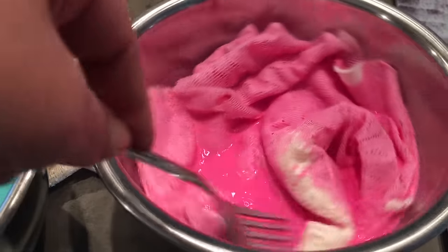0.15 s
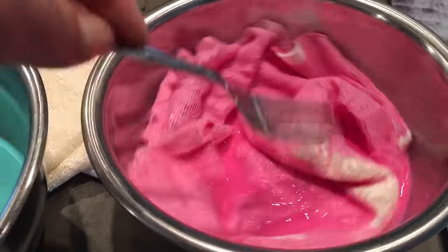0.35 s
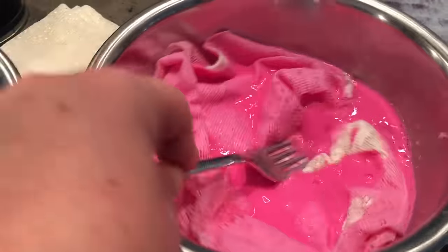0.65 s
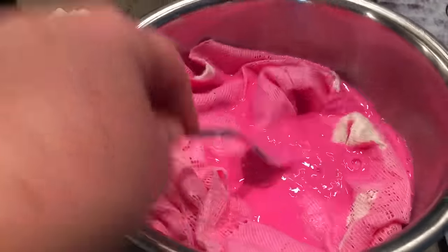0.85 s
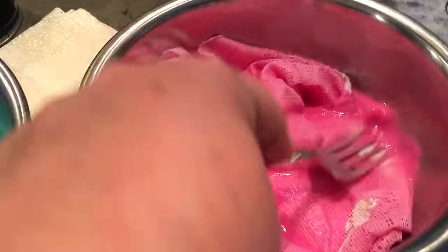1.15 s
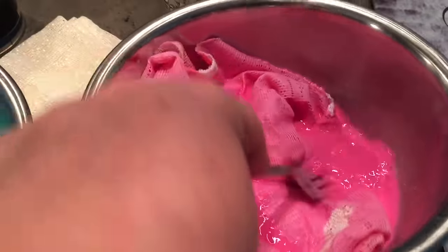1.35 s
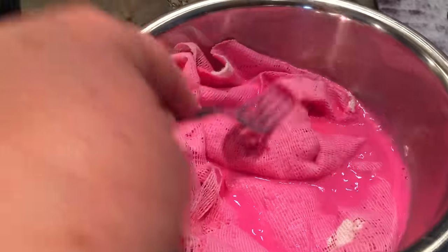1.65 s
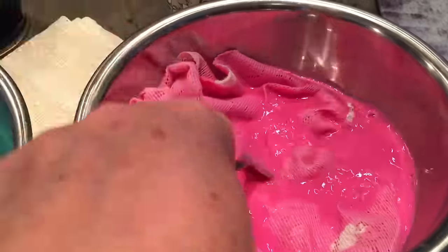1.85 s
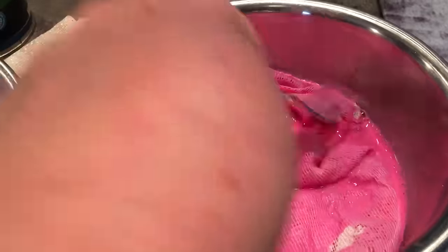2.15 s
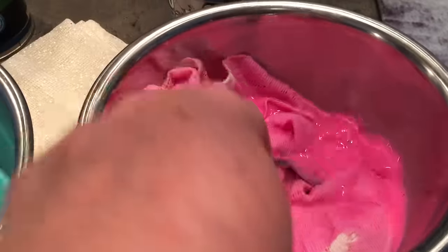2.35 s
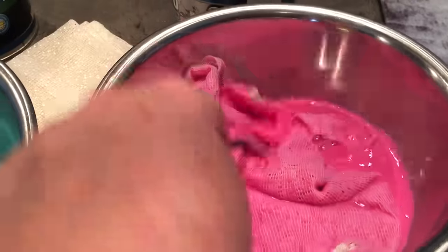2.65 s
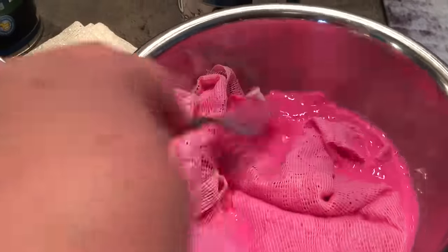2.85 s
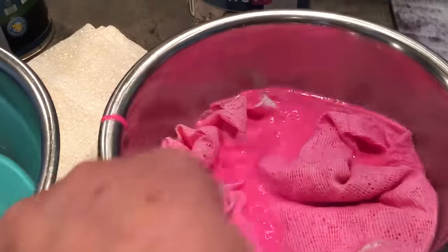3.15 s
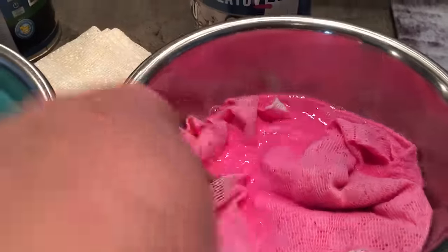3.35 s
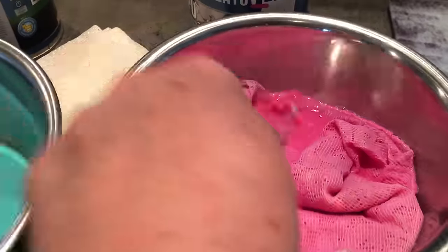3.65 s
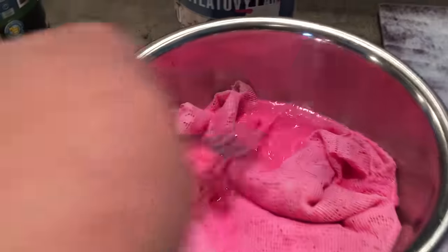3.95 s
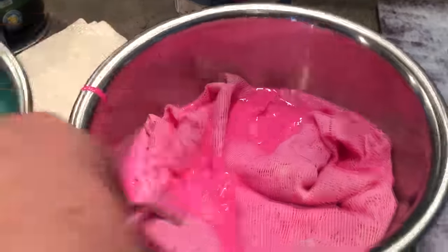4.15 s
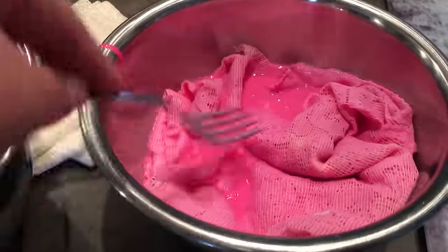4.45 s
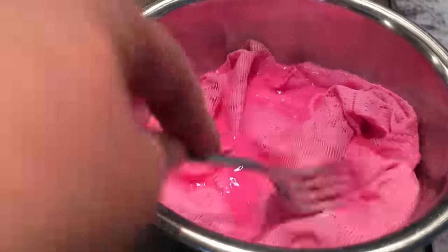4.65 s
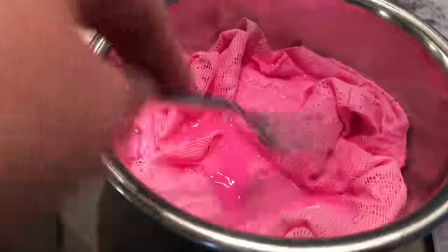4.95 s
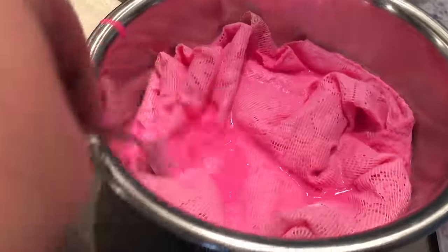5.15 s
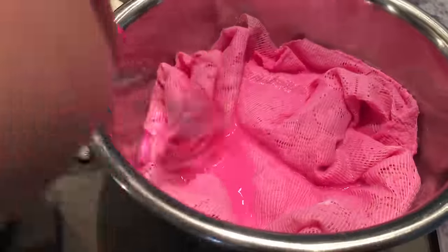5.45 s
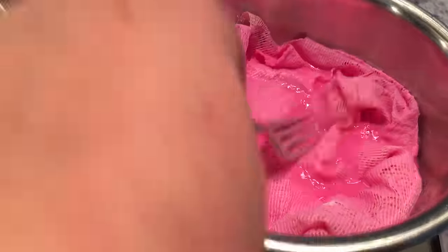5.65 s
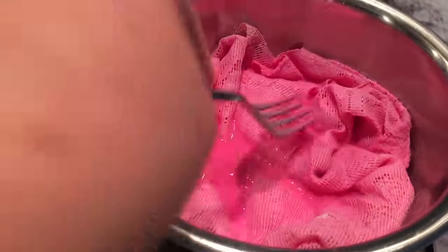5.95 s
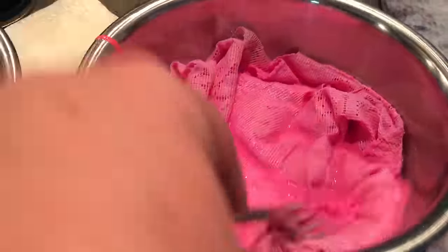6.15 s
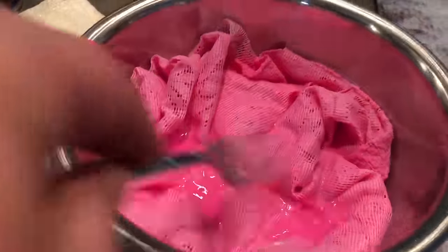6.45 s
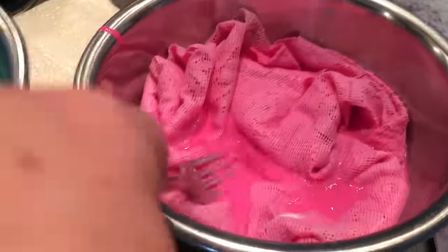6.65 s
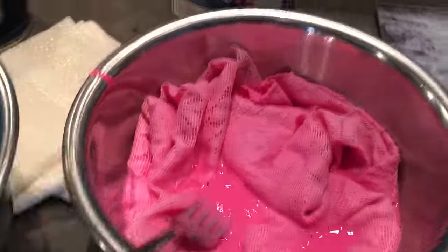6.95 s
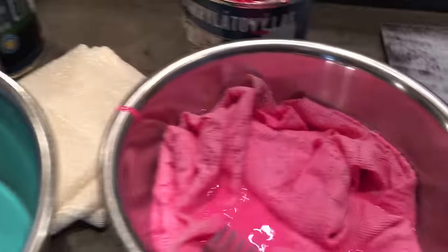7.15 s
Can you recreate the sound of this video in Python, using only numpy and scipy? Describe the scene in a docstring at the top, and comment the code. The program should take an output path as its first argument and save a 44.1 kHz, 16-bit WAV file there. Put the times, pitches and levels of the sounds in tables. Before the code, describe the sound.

Close up in a small kitchen, a fork pushes wet cloth into liquid in a thin steel bowl. Irregular presses, roughly two or three a second, give soft low thumps with hissing squelches and tiny bubble pops. A sharp spurt comes early on. Later the fork taps the steel, then clinks and scrapes in a brief bright cluster, leaving a little fizz over faint hum and air.

```python
"""On a kitchen counter, a fork presses wet cloth in a thin steel bowl of liquid, heard close up.
Each push thumps the bowl with dying low tones, and liquid hisses and whistles through the weave as noise.
Small bubbles pop as very short tones, and escaping air squeaks in thin glides.
Now and then the fork clinks or scrapes: short noise or grit sets the tones of the steel ringing.
A low hum and faint air noise lie below, and the bowl leaves a short echo in the room."""
import sys
import numpy as np
from scipy import signal
from scipy.io import wavfile
from scipy.ndimage import uniform_filter1d

SR = 44100
rng = np.random.default_rng(int(sys.argv[2]) if len(sys.argv) > 2 else 0)


def materialize(psi):
    """Save the field psi as 16-bit PCM at rate SR to the path in sys.argv[1].

    A 1-D psi becomes a single channel; in a 2-D psi each row is a channel.
    """
    bounded = np.clip(np.atleast_2d(psi).T, -1, 1)
    quanta = np.round(bounded * 32767).astype(np.int16)
    wavfile.write(sys.argv[1], SR, quanta)


N = 322415  # length of the scene in samples

# pushes that knock the bowl: start_s, level_db, then relative to it sway_db, upper_knock_db, slap_db
THUMPS = [(0.009, -39.5, -2, -10, -20), (0.203, -35.5, -2, 0, -12.5), (0.395, -43.5, 0, -1, -18),
          (0.616, -43.5, 2, 1.5, -15), (0.691, -30.5, -6, -4.5, -22), (0.768, -28, -18, -6.5, -20.5),
          (1.145, -29, 0, -3.5, -15.5), (1.239, -16, -15, -2.5, -18.5), (1.389, -29, -9, -5, -23),
          (1.463, -15, -17, -18, -23), (1.641, -27, -8.5, -11, -22), (1.778, -17, -13, -12, -25.5),
          (2.213, -35, 2.5, -5, -11.5), (2.29, -29.5, -12, 6.5, -3.5), (2.309, -14, -9.5, -2, -15.5),
          (2.34, -29, -2, -11, -9), (2.714, -14, -24, -9.5, -21), (3.176, -15.5, -13.5, -22.5, -23.5),
          (3.259, -16.5, -25, -16.5, -28), (3.618, -29.5, -12, -5.5, -18), (3.771, -11, -19, -5, -18.5),
          (4.229, -21, -20, -17.5, -24.5), (4.743, -20.5, -25, -4.5, -15.5), (4.79, -35, 5.5, -3, -20),
          (4.995, -19.5, -19, -12.5, -21.5), (5.183, -25, -5.5, -4, -13.5), (5.311, -32, -3.5, -15, -27),
          (5.477, -29, -8, -5.5, -32), (5.724, -22.5, -8, -7.5, -19), (6.247, -31, 2, -3, -15),
          (6.365, -23, -9, -11, -19), (6.485, -16, -13, -13.5, -21), (6.648, -22.5, -13.5, -2, -17),
          (6.875, -24, -4, -1, -6.5)]
# tone colour of liquid forced through cloth: pitch_hz, density_db (per Hz)
HISS = [(1200, -45), (2000, -8.5), (3200, 2.5), (4500, -2.5), (6000, 2), (8500, 3), (10500, -4),
        (12500, -2.5), (15500, -8), (16400, -32)]
# pitches at which the fork and bowl wall ring: pitch_hz
STEEL_HZ = [1030, 1599, 2207, 2815, 2870, 3400, 3765, 4120, 4450, 5040, 5250, 6330, 6615, 8370, 9040, 9900,
            10510, 12050, 13300, 14800, 15250]


def gain_of(db):
    """Turns decibels into amplitude, 20 dB for each factor of ten."""
    return 10 ** (np.asarray(db) / 20)


def evened(x):
    """Scales a signal to an average strength (rms) of 1."""
    return x / np.sqrt(np.mean(x ** 2) + 1e-20)


def add(mix, start_s, sound):
    """Mixes a sound in at a given time, cutting what runs past the end."""
    part = mix[max(round(start_s * SR), 0):][:len(sound)]
    part += sound[:len(part)]


def chatter(size):
    """Quick random unevenness of rms 1: noise averaged twice over size samples."""
    once = uniform_filter1d(rng.standard_normal(N), size)
    return evened(uniform_filter1d(once, size))


def noise(spectrum, patchy_db, size=512):
    """Noise of a given tone colour whose level drifts in patches of pitch and time."""
    hz = np.fft.rfftfreq(size, 1 / SR)
    curve_hz, curve_db = np.transpose(spectrum)
    real, imaginary, patches = rng.standard_normal((4 * N // size + 5, len(hz), 3)).T
    patches = uniform_filter1d(patches, size=6, axis=0)  # across pitch
    patches = evened(uniform_filter1d(patches, size=10, axis=1))  # across time
    shape_db = np.interp(np.log(hz + 1), np.log(curve_hz + 1), curve_db, -120, -120)
    frames = (real + 1j * imaginary) * gain_of(shape_db[:, None] + patchy_db * patches)
    return evened(signal.istft(frames, nperseg=size, noverlap=3 * size // 4)[1][:N])


def resonate(x, hz, width_hz):
    """A moving resonance: shifts the pitch curve hz down to zero, smooths, and shifts back."""
    turn = np.exp(2j * np.pi * np.cumsum(hz * np.ones(len(x))) / SR)
    hold = np.exp(-np.pi * width_hz / SR)
    smooth = signal.lfilter([1 - hold], [1, -hold], x / turn + 1e-18)
    return 2 * (turn * smooth).real


def ring(hz, db, t60, t, phase=0):
    """A struck body: a sum of sines, each fading by 60 dB in its own time t60."""
    fade = gain_of(db[:, None] - 60 * t / t60[:, None])
    return (fade * np.sin(2 * np.pi * (hz[:, None] * t + phase))).sum(0)


def kitchen_air():
    """Steady air noise with drifting patches, and an unchanging low hum of plain sines."""
    # tone colour of the air: pitch_hz, density_db (per Hz)
    air_colour = [(30, -29), (49, 5), (70, -6), (100, -8), (200, -12), (500, -33.5), (640, -20.5),
                  (1000, -37), (1400, -25), (2200, -34), (3500, -32.5), (8000, -35), (10500, -38),
                  (16300, -39)]
    # steady low hum: pitch_hz, level_db (rms)
    hum_tones = [(49, -61), (98, -68)]
    t = np.arange(N) / SR
    air = gain_of(-57) * noise(air_colour, patchy_db=2, size=2048)
    for hz, db in hum_tones:
        air = air + np.sqrt(2) * gain_of(db) * np.sin(2 * np.pi * hz * t)
    return air


def shudder():
    """How hard the counter trembles: a rest level, a dying shake with each push, a swell under each lean."""
    # the hand leans on the counter: middle_s, level_db
    leans = [(0.83, -51), (2.32, -35), (2.5, -40), (3.26, -35.5), (3.7, -40), (3.87, -40), (4.34, -44.5),
             (5.27, -40), (6.31, -48), (6.8, -44), (6.94, -39)]
    rest_db, lean_s = -58, 0.039
    shake_db, shake_rise_s, shake_t60_s = -27, 0.019, 0.61  # shake level is relative to its push
    t = np.arange(N) / SR
    out, shake_t = np.full(N, gain_of(rest_db)), t[:SR]
    for start_s, level_db, *_ in THUMPS:
        fade = gain_of(level_db + shake_db - 60 * shake_t / shake_t60_s)
        add(out, start_s - shake_rise_s, fade * np.minimum(shake_t / shake_rise_s, 1))
    for middle_s, db in leans:
        out += gain_of(db) * np.exp(-((t - middle_s) / lean_s) ** 2)
    return out


def squirts():
    """Squirts swell, sag and fade: gives hiss level in dB, whistle pitch and slosh gain over time."""
    # liquid squirting through the cloth; levels are set against each other:
    # start_s, length_s, fade_t60_s, hiss_db, whistle_hz, slosh_db
    squirt_list = [(0.072, 0.16, 0.78, -56.5, 9100, -64), (0.368, 0.054, .5, -60.5, 6460, -67.5),
                   (0.603, 0.02, 0.13, -55.5, 7100, -58), (0.661, 0.03, 0.19, -53.5, 9700, -62),
                   (0.97, 0.049, 0.23, -68, 6500, -60), (1.176, 0.15, 0.15, -48.5, 8500, -56),
                   (1.43, 0.046, 0.97, -60, 5000, -65), (1.719, 0.033, 0.34, -50.5, 5400, -58),
                   (2.044, 0.041, 0.18, -61.5, 3840, -66), (2.261, 0.028, .05, -53, 8250, -68),
                   (2.2858, .0015, .06, -15, 7500, -40), (2.292, .097, 0.052, -34, 5600, -46.5),
                   (2.37, 0.051, .6, -55, 3820, -59), (2.649, 0.093, 0.19, -47.5, 5840, -62),
                   (2.902, 0.027, 0.17, -54.5, 5140, -64), (3.068, 0.082, .5, -47.5, 4100, -64),
                   (3.393, 0.15, .6, -61, 7000, -62), (3.705, .09, 0.27, -53.5, 4800, -61),
                   (3.976, 0.081, 0.52, -64, 4200, -75), (4.158, .04, 1.5, -55, 7140, -64.5),
                   (4.678, 0.042, 0.37, -48.5, 6060, -67), (4.76, 0.078, 0.066, -56, 6470, -66),
                   (4.947, 0.072, 0.52, -62, 4100, -63), (5.171, .04, 0.33, -51.5, 4470, -59),
                   (5.243, 0.043, 0.18, -60, 8160, -56), (5.441, 0.082, 0.13, -60.5, 5200, -60.5),
                   (5.665, .03, 0.038, -52, 7200, -56.5), (5.73, 0.024, 0.1, -53, 4500, -57),
                   (5.895, .02, 0.21, -62, 5900, -75), (5.978, 0.024, 0.38, -69, 4100, -69),
                   (6.179, 0.083, 1.3, -52.5, 3920, -62.5), (6.677, 0.41, 0.34, -61.5, 3470, -59.5)]
    seep_db, lap_db = -68.5, -68.5  # steady seeping hiss and lapping slosh
    rise_share = 0.37  # part of a squirt spent swelling
    sag_db, glide = -7, .1  # a held squirt loses pressure while its whistle climbs by this share
    wave_db, wave_t60_s = -9, 0.28  # slosh after each slap, relative to the slap
    t = np.arange(SR) / SR
    hiss, slosh = np.full(N, gain_of(seep_db)), np.full(N, gain_of(lap_db))
    weight = np.full(N, gain_of(2 * seep_db))
    pitch = 6000 * weight  # the pitch is an average in which the strongest squirt counts most
    for start_s, length_s, t60, hiss_db, whistle_hz, slosh_db in squirt_list:
        done = np.minimum(t / length_s, 1)
        swell = np.minimum(done / rise_share, 1) ** 2
        fade_db = -60 * np.maximum(t - length_s, 0) / t60
        shape = swell * gain_of(sag_db * (done - rise_share) + fade_db)
        jet = gain_of(hiss_db) * shape
        add(hiss, start_s, jet)
        add(slosh, start_s, gain_of(slosh_db) * shape)
        add(weight, start_s, jet ** 2)
        add(pitch, start_s, jet ** 2 * whistle_hz * (1 + glide * (done - .5)))
    for start_s, level_db, *_, slap_db in THUMPS:
        add(slosh, start_s, gain_of(level_db + slap_db + wave_db - 60 * t / wave_t60_s))
    return 20 * np.log10(hiss), pitch / weight, slosh


def liquid():
    """Sputtering hiss with a wandering whistle, slosh below it, and the counter's rumble."""
    # tone colours of moving liquid and of the counter: pitch_hz, density_db (per Hz)
    slosh_colour = [(150, -11), (300, 3.5), (600, -2), (1200, -6), (2400, -15), (4000, -65), (6000, -54)]
    rumble_colour = [(25, -50), (40, -10), (50, -1), (66, 3), (90, -3), (140, -14)]
    hiss_db, whistle_hz, slosh_gain = squirts()
    hiss = noise(HISS, patchy_db=1.6)
    whistling = np.clip((hiss_db + 64) / 24, 0, 1.2)  # harder squeezes whistle more
    hiss = hiss + whistling * evened(resonate(hiss, whistle_hz, 600))
    sputter_db = np.clip(-(hiss_db + 30) / 5, 1.5, 4) * chatter(60)  # a strong jet flows evenly
    slosh = noise(slosh_colour, patchy_db=4.5, size=1024)
    rumble = noise(rumble_colour, patchy_db=1.5, size=4096)
    return hiss * gain_of(hiss_db - 4 + sputter_db) + slosh * slosh_gain + rumble * shudder()


def squeaks():
    """Air leaving the cloth: thin gliding sines of slightly unsteady level."""
    # squeaks, levels set against each other: start_s, end_s, start_hz, end_hz, level_db
    squeak_list = [(4.898, 4.995, 3850, 4030, -67), (5.108, 5.135, 3900, 4100, -66),
                   (7.196, 7.314, 4870, 5470, -66.5), (4.685, 4.695, 1750, 1440, -48.5),
                   (4.73, 4.737, 2010, 2100, -49), (5.534, 5.542, 2550, 2580, -47.5)]
    out, waver = np.zeros(N), chatter(300)
    for start_s, end_s, start_hz, end_hz, db in squeak_list:
        count = round((end_s - start_s) * SR)
        glide_hz = np.linspace(start_hz, end_hz, count)
        tone = np.sin(2 * np.pi * np.cumsum(glide_hz) / SR)
        add(out, start_s, gain_of(db + 2) * tone * signal.windows.tukey(count, .3))
    return out * gain_of(2 * waver)


def pop(hz, cycles):
    """A bubble wall snaps: a tone with a soft start that dies away over a few cycles."""
    turns = np.arange(400) * hz / SR
    fade = np.exp(-turns / max(cycles, .3))
    return fade * (1 - np.exp(-turns / .4)) * np.sin(2 * np.pi * turns)


def clear_pops():
    """Single bubbles bursting in the weave, and a few sharp clicks, each one short dying tone."""
    # bubbles and sharp clicks, levels set against each other: start_s, level_db, pitch_hz, fade_cycles
    pop_list = [(0.0999, -42, 3400, 2.6), (0.1188, -31.5, 2860, 0.83), (0.1814, -29.5, 6120, 1.3),
                (0.225, -33, 3920, 1.4), (0.247, -41, 4300, 3), (0.274, -41, 3300, 3),
                (0.3183, -35, 2970, .85), (0.3561, -36, 3520, 2.2), (0.3793, -36, 5810, 1.2),
                (0.404, -30, 3450, 0.8), (0.4296, -33, 6460, 1.1), (0.502, -32, 3670, 0.78),
                (0.5175, -33, 3730, 1.5), (0.556, -38, 7580, 1.8), (0.5765, -38, 6370, 1.6),
                (0.667, -17, 8500, 0.53), (0.6823, -31, 2420, 3.4), (0.7516, -36, 4800, 1.1),
                (0.9487, -35, 11150, 1.6), (1.0111, -34, 8310, 1.5), (1.0537, -30, 9600, 4.6),
                (1.0956, -29, 4950, 1), (1.1175, -32, 1390, 0.45), (1.1425, -36, 4480, 1.1),
                (1.1994, -34, 6240, 1.8), (1.239, -27, 2200, 1.5), (1.2451, -25, 8960, 3.3),
                (1.455, -28, 3600, 2.3), (1.4843, -30.5, 5700, 1.7), (1.5702, -30.5, 4060, 1.2),
                (1.6455, -31.5, 8200, 0.95), (1.742, -24, 1530, 0.75), (1.7597, -31.5, 5600, 3.1),
                (1.995, -35, 14000, 1.2), (2.1115, -24, 13000, 1.1), (2.112, -36, 2200, 1.9),
                (2.126, -30, 11400, 1.5), (2.213, -37, 3570, 3.2), (2.2863, -12, 7000, .8),
                (2.456, -30, 1890, 0.72), (2.4564, -25, 11000, 0.8), (2.67, -31, 6200, 1.8),
                (2.6795, -26.5, 6000, 1.8), (2.7126, -28, 5800, 1.3), (2.7565, -31.5, 4180, 2.3),
                (2.9279, -33.5, 10000, 1.9), (3.1088, -28, 3730, 2.6), (3.1216, -16.5, 5130, 0.73),
                (3.2192, -31, 4550, 1.1), (3.2716, -33, 8150, 2.1), (3.4115, -30.5, 6500, 0.82),
                (3.4558, -29.5, 5510, 1.16), (3.4823, -33, 5470, 1.55), (3.5268, -31.5, 7860, 1.3),
                (3.7687, -24, 1490, 0.77), (3.7868, -20, 3360, 0.66), (3.8281, -33, 5640, 1.3),
                (3.965, -32, 6120, 1.1), (3.9827, -29.5, 8450, 1.7), (4.0486, -37, 2030, 1.7),
                (4.1192, -31, 5990, 1.7), (4.126, -29, 6980, 1.1), (4.3936, -35, 12320, 1.8),
                (4.4895, -38, 9200, 2.3), (4.4242, -40, 6290, 1.2), (4.507, -42, 2100, 1.1),
                (4.696, -33, 3000, .6), (4.718, -37, 2000, 1.1), (4.733, -35, 5500, 1.1),
                (4.764, -39, 3450, 3), (4.828, -28, 2410, 0.44), (4.8387, -31.5, 4610, 1.3),
                (4.9037, -34.5, 7100, 1.9), (5.119, -35, 5900, 1.8), (5.1364, -35, 3400, 1.7),
                (5.1438, -32, 7750, 1.5), (5.1604, -29, 7670, 1), (5.242, -23.5, 1690, 1.07),
                (5.2557, -32, 3430, 1.4), (5.3598, -36, 6060, 1.8), (5.3644, -37, 3550, 1.8),
                (5.4566, -34, 8800, 1.9), (5.58, -38, 1860, 1.3), (5.5953, -26.5, 6060, 1.04),
                (5.6354, -37, 4500, 1.3), (5.6788, -18, 3630, 0.33), (5.6828, -22, 12700, 1.6),
                (5.811, -33.5, 6030, 1.5), (5.9024, -24.5, 3230, 0.45), (5.9957, -33, 3420, 1.3),
                (6.022, -31.5, 5960, 2.6), (6.0558, -33.5, 9470, 1.5), (6.149, -37.5, 3630, 1.3),
                (6.2334, -26.5, 2930, 0.68), (6.2607, -31, 4900, 1.1), (6.5597, -37, 4730, 2.1),
                (6.5662, -35, 6120, 2.1), (6.6444, -27, 1560, 0.55), (7.159, -33.5, 3700, 2.7),
                (7.1784, -39, 8480, 1.8), (7.198, -39, 6000, 2.5), (7.2146, -38, 6460, 1.8)]
    out = np.zeros(N)
    for start_s, db, hz, cycles in pop_list:
        add(out, start_s, gain_of(db + 6.0) * pop(hz, cycles))
    return out


def fizz():
    """Tiny bubbles at random moments, thicker and louder as the cloth is squeezed."""
    per_s, thicken = 800, .4  # bubbles near a -60 dB hiss; dB of thickening for each dB more hiss
    when, size = rng.random((2, N))
    hiss_db = np.minimum(squirts()[0], -45)
    rate = per_s * gain_of(thicken * (hiss_db + 60) + 4 * chatter(400))
    bubble_db = 0.45 * hiss_db - 25 - 4.06 * np.log(size + 0.0077)  # many small, few large
    train = (when < rate / SR) * gain_of(bubble_db)
    kind = rng.integers(0, 16, N)  # which of 16 pitches
    out = np.zeros(N)
    for k, hz in enumerate(np.geomspace(2500, 15000, 16)):
        out += signal.oaconvolve(train * (kind == k), (hz / 7000) ** .45 * pop(hz, 1.57))[:N]
    return out


def scrape():
    """The fork drags on the wall: uneven grit keeps the steel's tones humming briefly."""
    # strength of the drag: time_s, level_db
    drag = [(6.76, -77), (6.81, -40), (6.855, -33), (6.9, -34.5), (6.95, -33), (6.98, -56), (7.06, -52),
            (7.12, -55), (7.2, -100)]
    drag_s, drag_db = np.transpose(drag)
    level_db = np.interp(np.arange(N) / SR, drag_s, drag_db)
    grit = rng.standard_normal(N) * gain_of(level_db + 2.2 * chatter(150))
    hz = np.array(STEEL_HZ)
    mode_db = -4.0 * np.log2(hz / 2800) ** 2
    # held and wet, the wall rings briefly
    body = ring(hz, mode_db, np.full(len(hz), .02), np.arange(SR // 10) / SR)
    body[0] = 2.4  # the rasp of the tines itself
    out, start_s = np.zeros(N), drag_s[0]
    add(out, start_s, signal.fftconvolve(grit[round(start_s * SR):], body / np.linalg.norm(body)))
    return out


def clinks():
    """Fork on steel: a short crack and a lingering ring, both coloured by where the fork lands."""
    # clinks: start_s, crack_db, crack colour as low_db (under 3 kHz), upper_db (near 6), high_db (near 9),
    # then ring_db near 1.6, 2.2, 2.85, 3.8, 7.5 and over 10.5 kHz
    clink_list = [(4.3166, -18, -11, -20, -18, -51, -57, -59, -50, -53.5, -56),
                  (5.2799, -34, 9, -8, -3, -68, -46, -50, -60, -55, -71),
                  (6.3187, -5, -11, -28, -17, -36, -37.5, -45, -46, -47, -36),
                  (6.726, -11.5, 3, 2.5, -2.5, -35, -58, -43, -39, -42, -56),
                  (6.7385, -28.5, 11, -5, 1, -42, -56, -26, -48, -52, -60),
                  (6.856, -8.5, -2, 4, -2, -28.5, -41, -37, -31, -34, -25),
                  (6.9019, -13, -7, -1, .5, -28, -43, -26, -28, -27, -39),
                  (6.9274, -16, 1, 5, 0, -47, -40, -25.5, -27, -34, -50),
                  (6.9455, -24, -3, -4, -5, -38, -46.5, -28, -38, -45, -56)]
    # how each steel tone rings, one row per pitch: relative_db, fade_t60_s
    steel_ring = [(-6, 0.27), (1.5, 0.21), (3, 0.33), (-13, 0.061), (-5, 0.14), (-9, .2), (-1, 0.11),
                  (-8, 0.11), (-23, 0.07), (-22, .08), (-11, .1), (-9, 0.18), (9.5, 0.063), (9, 0.11),
                  (7, 0.076), (-14, .06), (-11, 0.25), (-11, 0.14), (-10, 0.07), (-9, .06), (-7, .05)]
    out, rings, t = np.zeros(N), np.zeros(N), np.arange(SR // 2) / SR
    hz, (db, t60) = np.array(STEEL_HZ), np.transpose(steel_ring)
    bursts = rng.standard_normal((len(clink_list), 1000))
    phases = rng.random((len(clink_list), len(hz), 1))
    for row, burst, phase in zip(clink_list, bursts, phases):
        start_s, level_db, low, upper, high, *rings_db = row
        top = -5 + 1.7 * high  # the crack over 12 kHz follows its colour near 9 kHz
        crack_db = np.interp(
            hz, [1030, 1600, 2200, 2850, 3400, 3770, 4450, 5000, 6700, 8400, 10500, 12000],
            [low - 3, low, low - 10, low, -6, 0, -8, upper, upper, high, high, top])
        # cloth and liquid soak up the first swing
        body = ring(hz, crack_db, np.full(len(hz), .011), t[:800], phase)
        blow = burst * gain_of(-60 * t[:1000] / 0.018)
        blow[0] += 5  # the first contact
        crack = np.convolve(blow, body / np.linalg.norm(body))
        add(out, start_s, gain_of(level_db) * crack * (1 - np.exp(-t[:len(crack)] / 0.00068)))
        ring_db = np.interp(hz, [1600, 2200, 2850, 3770, 7500, 10500], rings_db)
        add(rings, start_s, ring(hz, db + ring_db, t60, t, phase) * (1 - np.exp(-t / 0.00043)))
    return out + rings * gain_of(2 * chatter(200))  # sloshing liquid makes the ring unsteady


def thumps():
    """A wet slap, then a soft push of a few ms rings the low tones; the first swings ring louder before
    settling into a weaker tail."""
    # tone colour of the slap: pitch_hz, density_db (per Hz)
    slap_colour = [(500, 1.5), (1000, 6), (2000, -0.5), (3500, -6.5), (6000, -12.5), (10000, -37)]
    # bowl and counter together, pitch and fade varied a little by each push:
    # pitch_hz, relative_db, fade_t60_s, group (rounded: 0 main, 1 sway, 2 upper knock, 3 edge)
    base_modes = [(183.6, -2.5, 0.19, 0.5), (209.6, -14, 0.3, 0.5), (122.1, -7, 0.6, 2),
                  (150.6, 2, 0.24, 1), (254.5, -10, .12, 2), (332.2, 4, 0.079, 2), (391.5, -3.5, 0.079, 2),
                  (531, -2.5, 0.064, 3), (703.4, 3.5, 0.036, 3), (895, -7, 0.059, 3),
                  (1064, -13.5, 0.044, 3)]
    (out, slaps, snaps), t = np.zeros((3, N)), np.arange(SR // 2) / SR
    hz, db, t60, group = np.transpose(base_modes)
    group = np.round(group).astype(int)
    damping, slap_rise = 0.67 + 0.61 * np.exp(-t / 0.037), 1 - np.exp(-t / .002)
    chance = rng.standard_normal((len(THUMPS), 2, len(base_modes)))
    for (start_s, level_db, sway_db, upper_db, slap_db), (detune, phase) in zip(THUMPS, chance):
        edge_db = -6 + 0.84 * upper_db  # the edge tones follow the upper knock
        lasting = .78 - 0.0169 * upper_db  # a harder knock is held tighter and rings shorter
        modes_db = level_db + db + np.array([0, sway_db, upper_db, edge_db])[group]
        sound = ring(hz * (1 + 0.017 * detune), modes_db, t60 * lasting, t, 0.19 * phase[:, None])
        add(out, start_s - .003, sound * (1 - np.exp(-t / 0.0039)) * damping)
        wet_db = level_db + slap_db
        add(slaps, start_s - .004, gain_of(wet_db - 60 * t / 0.073) * slap_rise)
        add(snaps, start_s - .004, gain_of(wet_db - 9 - 60 * t / .015) * slap_rise)
    # the treble is over first
    return out + slaps * noise(slap_colour, patchy_db=2.0) + snaps * noise(HISS, patchy_db=3)


def room(x):
    """Echo of the room: sparse taps of random sign, the treble dying first."""
    taps = np.zeros(SR // 2)
    at = np.arange(100, len(taps) - 20, 20)
    taps[at + rng.integers(0, 20, len(at))] = rng.choice([-1., 1.], len(at))
    hz, t, frames = signal.stft(taps, SR, nperseg=256)
    t60 = np.interp(hz, [200, 2000, 12000], [.4, .3, .15])
    tail = signal.istft(frames * gain_of(-60 * t / t60[:, None]), SR, nperseg=256)[1]
    return signal.fftconvolve(x, tail / np.linalg.norm(tail))[:N]


def scene():
    """Kitchen air, liquid, squeaks, bubbles, fork and thumps; the last three also echo in the room."""
    air = kitchen_air()
    sharp = clear_pops() + fizz() + scrape() + clinks()
    knocks = thumps()
    echo = room(gain_of(-14) * knocks + gain_of(-16.5) * sharp)
    return (air + liquid() + squeaks() + sharp + knocks + echo)[None]


def record(dry):
    """The small microphone drops the deepest bass; then a filter cuts all above its edge."""
    edge_hz = 16250
    high_pass = signal.butter(4, 38, "high", fs=SR, output="sos")
    thinned = signal.sosfilt(high_pass, dry)
    low_pass = signal.firwin(511, edge_hz, window=("kaiser", 9), fs=SR)
    return signal.oaconvolve(thinned, low_pass[None], "same")


dry = scene()
out = record(dry)
materialize(out)
```